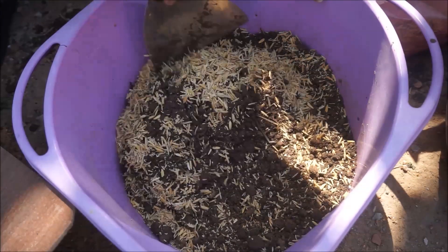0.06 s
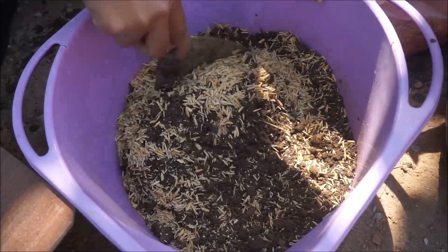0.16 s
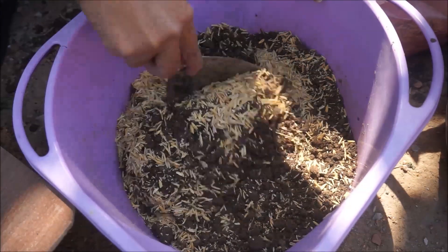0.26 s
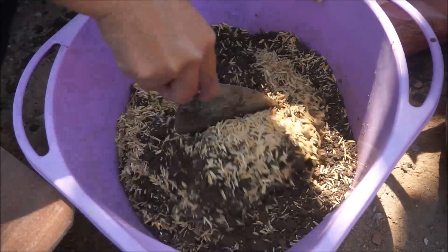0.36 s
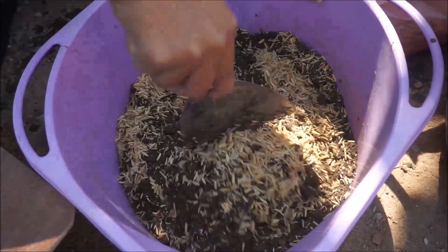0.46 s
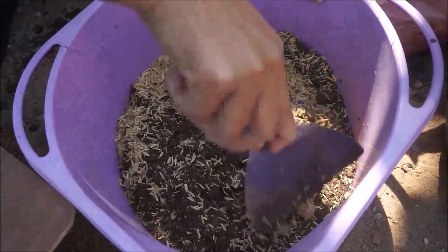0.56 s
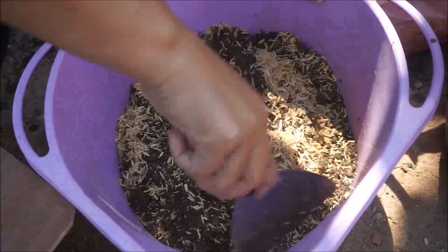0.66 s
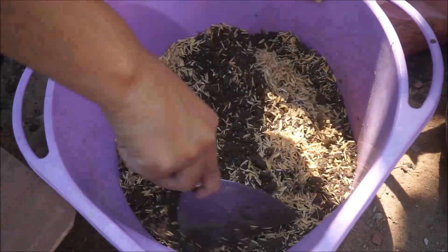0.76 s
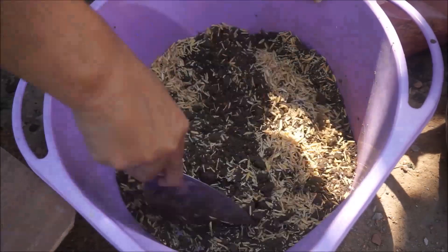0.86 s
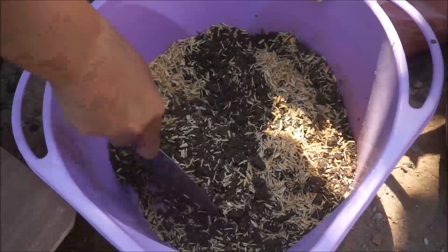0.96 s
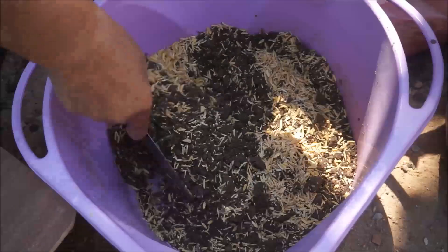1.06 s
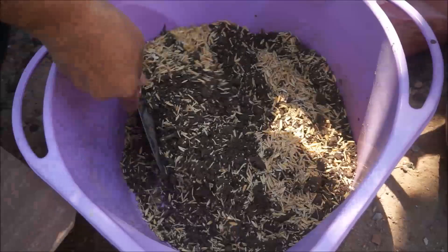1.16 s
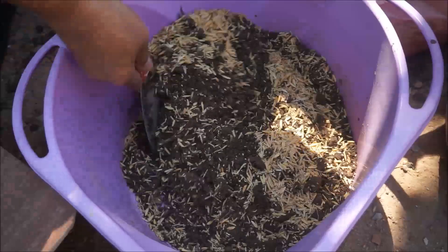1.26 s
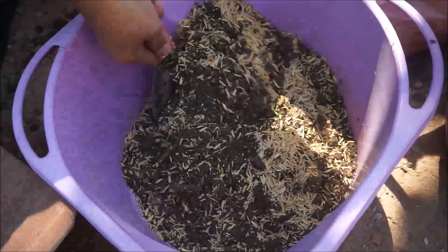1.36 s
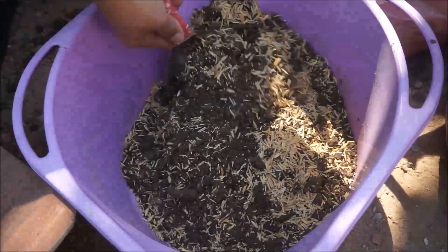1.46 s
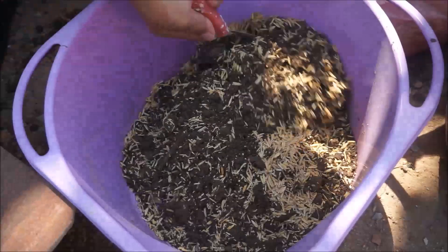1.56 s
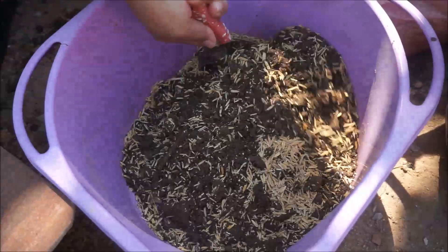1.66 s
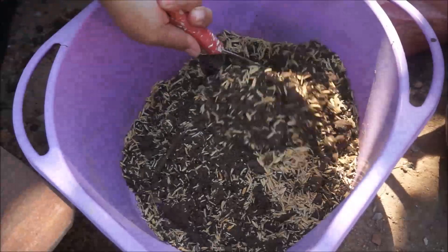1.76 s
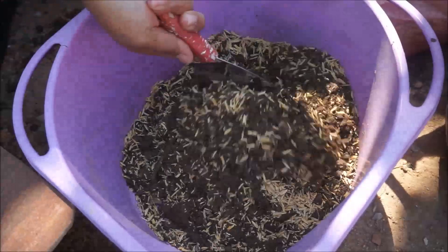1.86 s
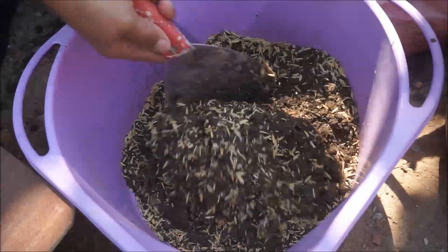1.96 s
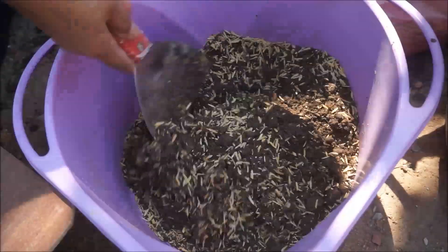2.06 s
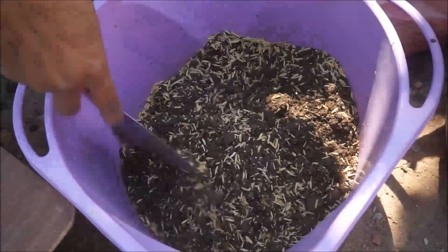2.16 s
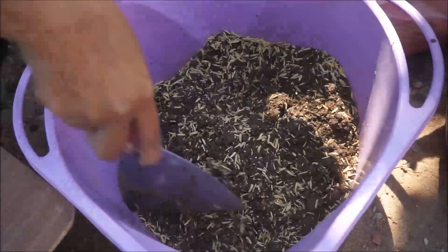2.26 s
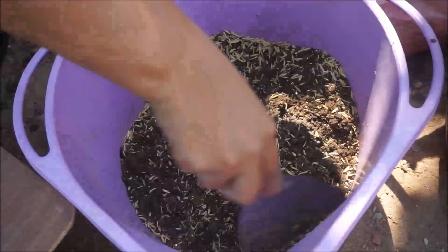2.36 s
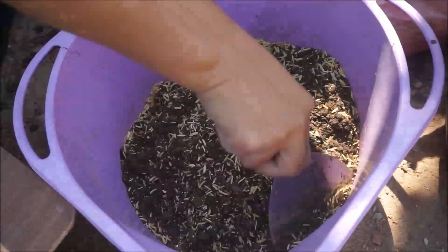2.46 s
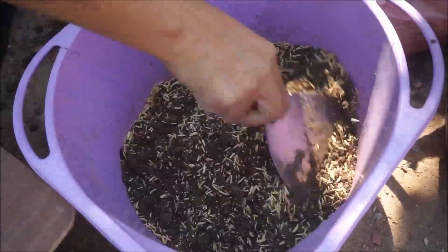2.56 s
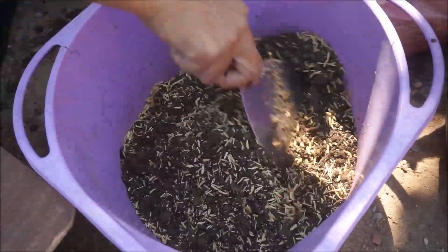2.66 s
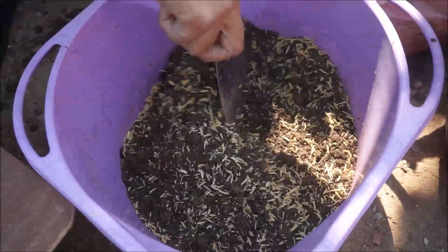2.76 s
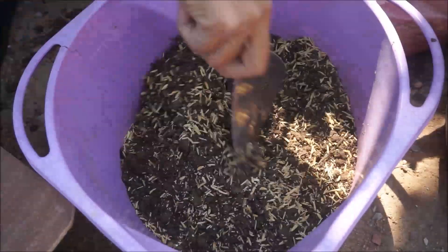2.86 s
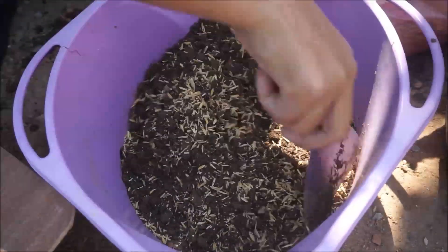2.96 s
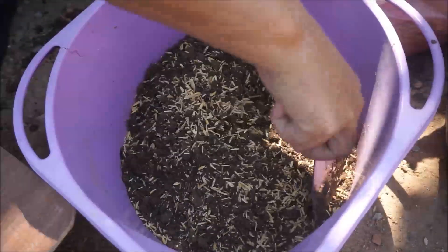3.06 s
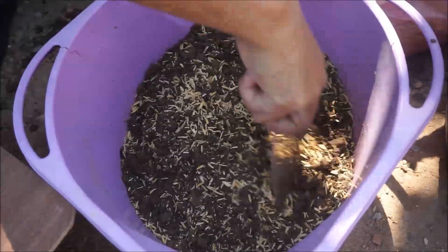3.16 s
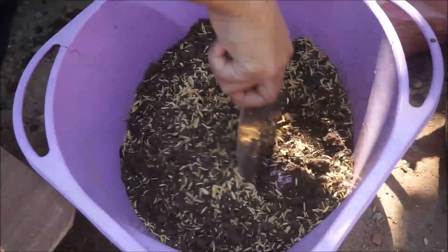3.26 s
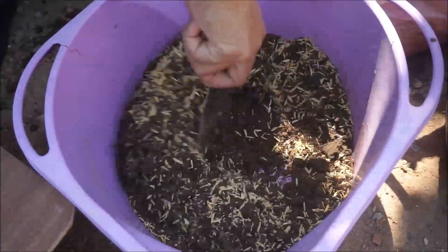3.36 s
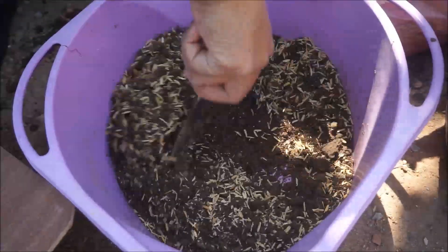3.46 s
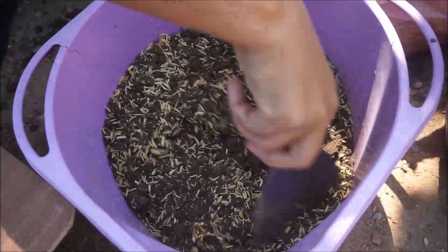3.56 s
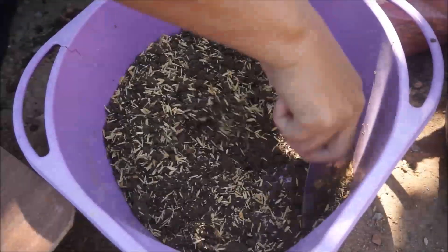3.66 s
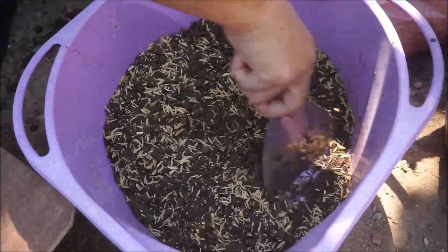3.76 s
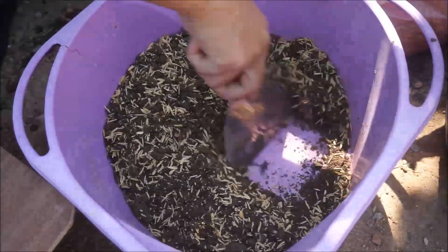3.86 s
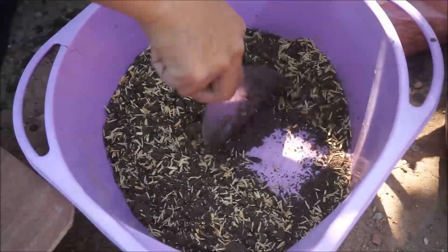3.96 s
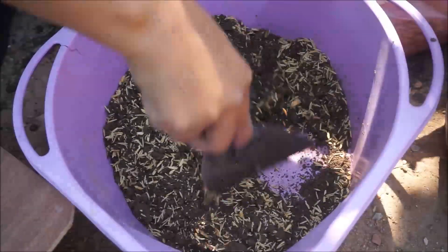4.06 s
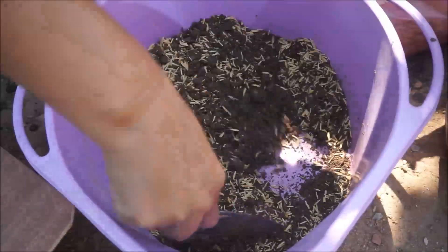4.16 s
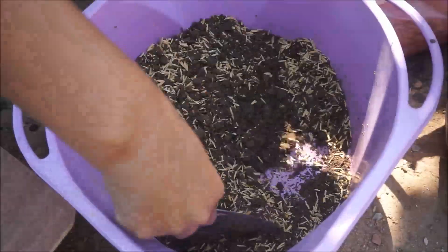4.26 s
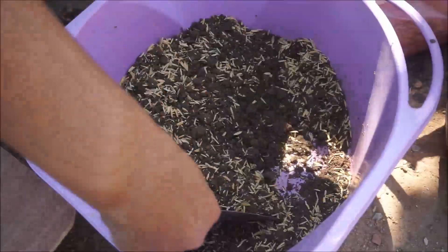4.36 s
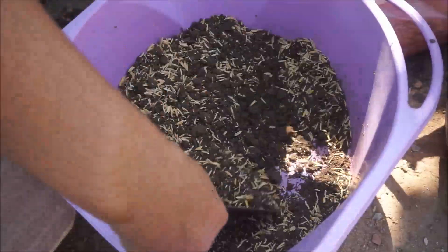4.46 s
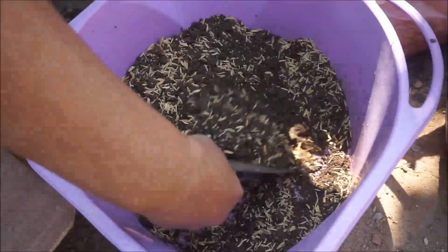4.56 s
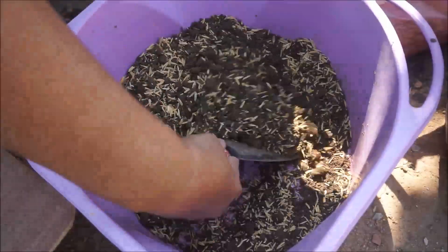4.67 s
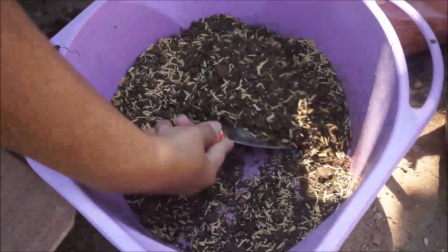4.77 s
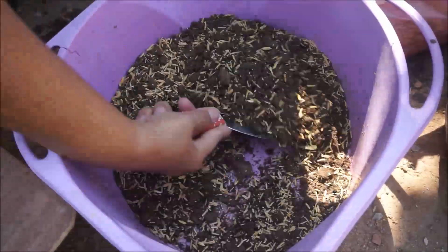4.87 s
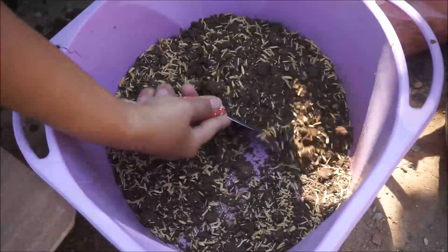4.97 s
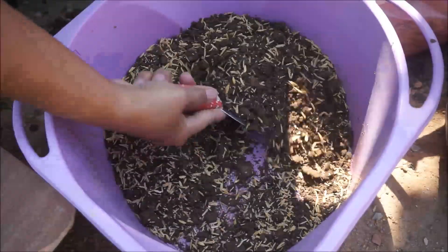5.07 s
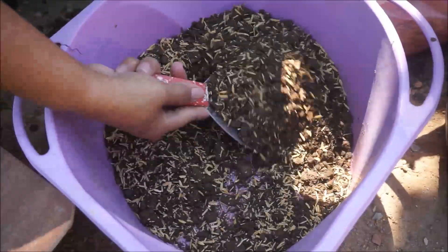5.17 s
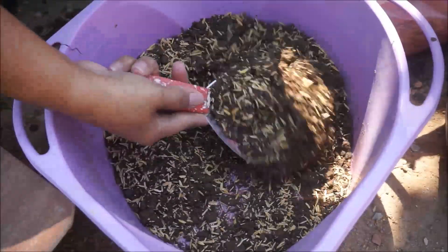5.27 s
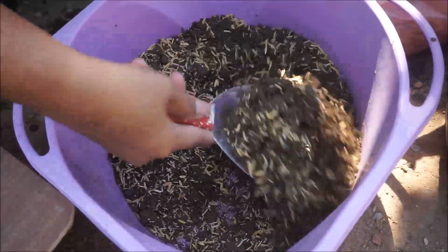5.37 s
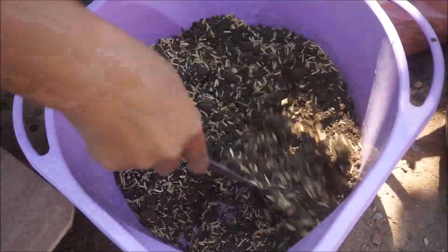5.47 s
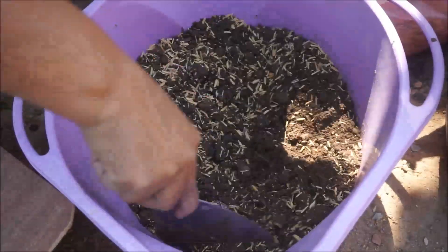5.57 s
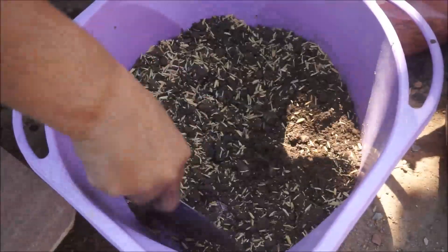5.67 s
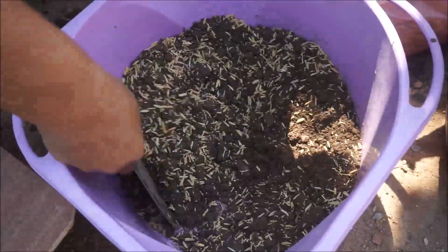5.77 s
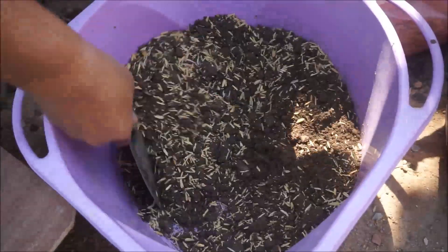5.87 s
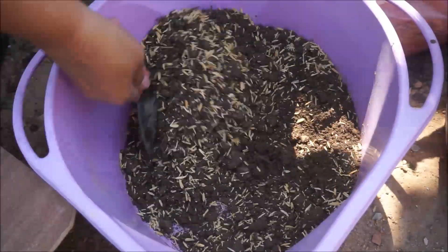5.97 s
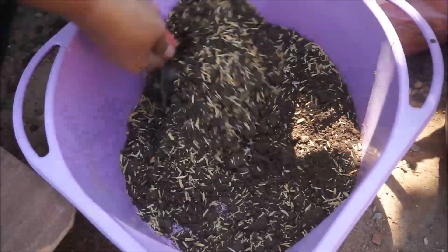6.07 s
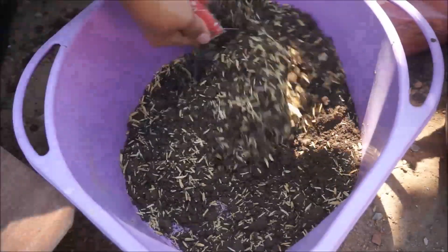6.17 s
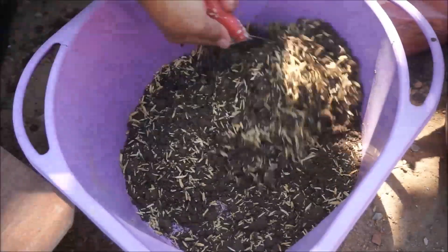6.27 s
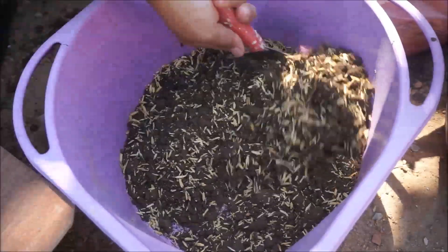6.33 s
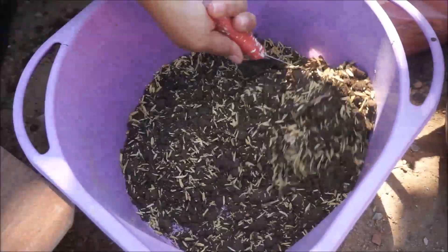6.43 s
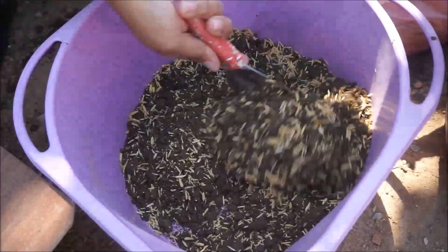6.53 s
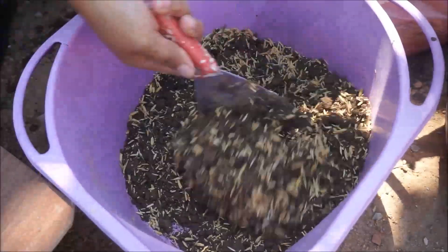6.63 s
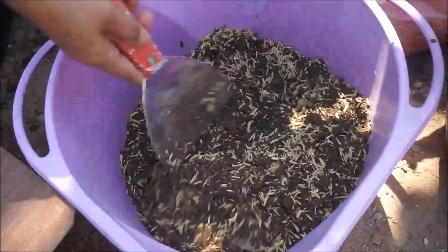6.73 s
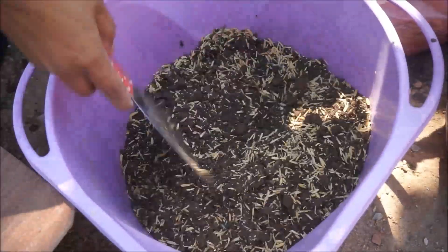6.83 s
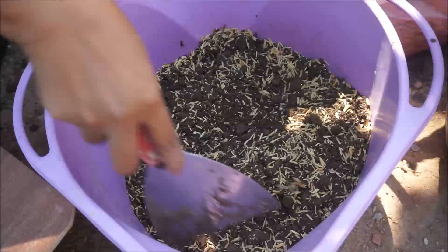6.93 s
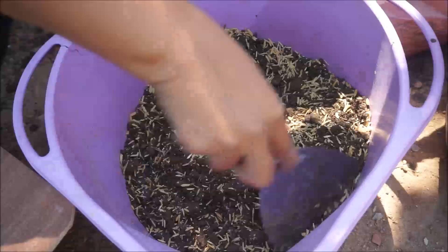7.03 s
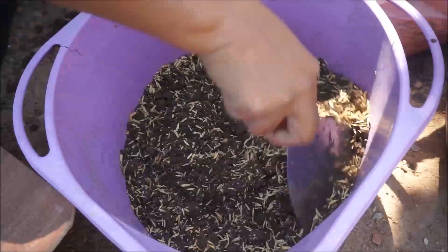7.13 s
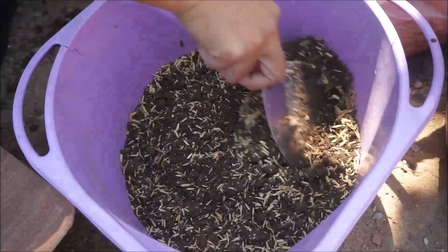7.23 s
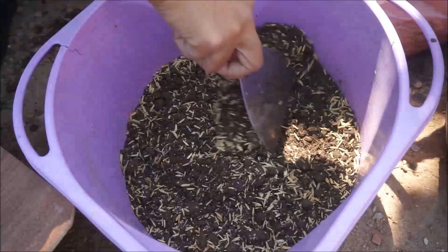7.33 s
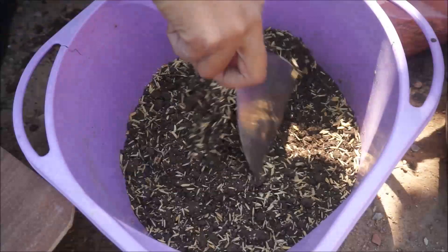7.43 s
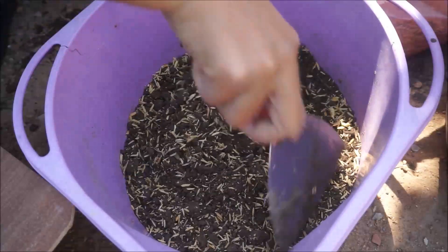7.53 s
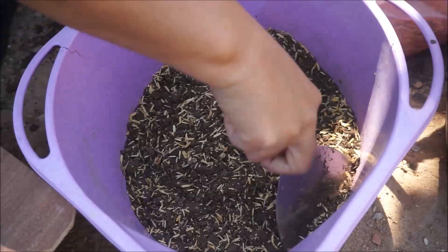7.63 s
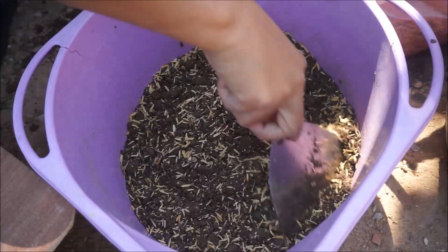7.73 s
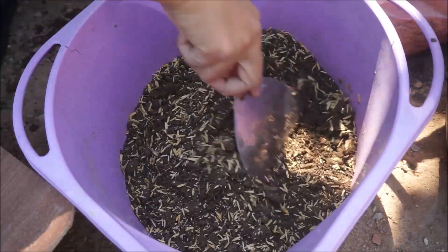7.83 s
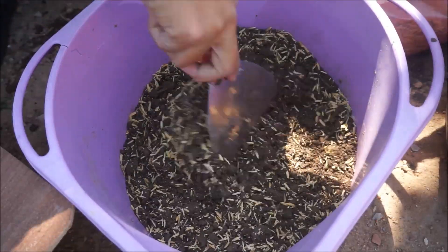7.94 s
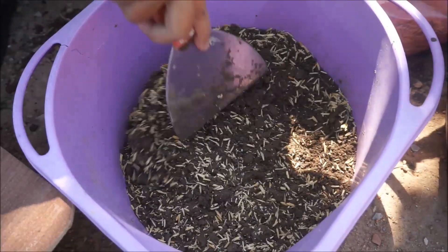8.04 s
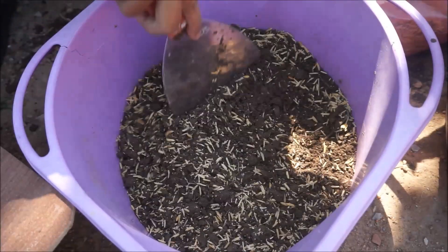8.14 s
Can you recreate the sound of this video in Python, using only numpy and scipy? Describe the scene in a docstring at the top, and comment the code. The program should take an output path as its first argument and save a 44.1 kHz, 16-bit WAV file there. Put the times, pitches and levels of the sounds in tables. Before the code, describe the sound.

Close outdoors, a steel trowel works dry soil and light husks in a plastic tub. Husks hiss off the blade at once, then a brief squeaky rub at 0.3 s leads to a crunchy push with knocks and a bright scrape around 0.7 s. Steady gritty strokes follow, with a swish of husks near 1.5 s. Hollow knocks land at 2.3-2.4 s, then a burst of rustling at 2.5 s and a hard clack at 3.0 s. Sharp clicks cluster at 3.6 s and 4.7-4.9 s amid longer, softer turning. At 5.6 s the blade jams with knocks and scrapes and the whole tub booms. A ringing click and rasp come near 6.1 s, then pouring husks and a quieter stretch. Dull knocks at 7.05 and 7.6 s precede light crunching to the end at about 8 s. A faint distant motor drone and wavering whine linger beneath.

```python
"""Trowel in a tub of dry soil

Outdoors, close to a phone's microphone, a steel hand trowel turns dry soil and husks in a plastic tub.
Damped modes of tub and blade give its knocks and ticks; filtered random clicks make soil crunch and husks hiss.
Gliding resonances make the edge scrape, and one hard shove flexes the whole tub.
Far away a motor drones as a stack of harmonics and a faint whine wavers as narrow noise."""
import sys
import numpy as np
from scipy import signal
from scipy.fft import rfft, irfft
from scipy.io import wavfile

SR = 44100
rng = np.random.default_rng(int(sys.argv[2]) if len(sys.argv) > 2 else 0)


def int16_out(signal):
    """Quantize to a 16-bit WAV file."""
    q = np.round(np.clip(np.atleast_2d(signal).T, -1, 1) * 32767)
    wavfile.write(sys.argv[1], SR, q.astype(np.int16))


N = 361616
TIME = np.arange(N) / SR


def undb(db):
    """Decibels to gain."""
    return 10 ** (np.asarray(db) / 20)


def unit(x):
    """Scale to rms 1."""
    return x / np.sqrt(np.mean(x ** 2) + 1e-20)


def curves(table):
    """Each column of a table, joined by straight lines in time."""
    s, *columns = np.transpose(table)
    return [np.interp(TIME, s, c) for c in columns]


def colour(x, points):
    """Filter by (Hz, dB) points with a causal response, so that clicks keep their front."""
    size = 2048
    hz, db = np.transpose(points)
    f = np.maximum(np.arange(size // 2 + 1) * SR / size, 1)
    log_gain = np.log(undb(np.interp(np.log(f), np.log(hz), db)))
    # folding the cepstrum onto positive time gives the minimum-phase response
    cepstrum = irfft(log_gain)
    cepstrum[1:size // 2] *= 2
    cepstrum[size // 2 + 1:] = 0
    response = irfft(np.exp(rfft(cepstrum)))
    return signal.fftconvolve(x, response[None], axes=1)[:, :x.shape[1]]


def band(x, hz, width_hz):
    """One fixed resonance."""
    b, a = signal.iirpeak(min(hz, SR / 3), hz / width_hz, fs=SR)
    return signal.lfilter(b, a, x)


def glide(x, hz, share):
    """A resonance that follows the curve hz; its width is a share of its mean pitch."""
    turn = np.exp(2j * np.pi * np.cumsum(hz) / SR)
    pole = np.exp(-np.pi * share * np.mean(hz) / SR)
    return (turn * signal.lfilter([1], [1, -pole], x / turn)).real


def walk(rate, count=N):
    """Smooth chance with spread near 1, changing rate times a second."""
    at = np.arange(count) * rate / SR
    knots = int(at[-1]) + 2
    return np.interp(at, np.arange(knots), rng.standard_normal(knots))


def clicks(rate, spread_db, count=N):
    """Random clicks of uneven size, rate a second, rows mid and side; each comes from its own place."""
    happens = rng.random(count) < rate / SR
    size = happens * undb(spread_db * np.minimum(rng.exponential(size=count), 5))
    place = np.array([rng.choice([-1., 1.], count), rng.standard_normal(count)])
    return unit(size * place)


def add(out, s, sound):
    """Mix a sound in at time s."""
    i = max(int(s * SR), 0)
    out[:, i:i + sound.shape[1]] += sound[:, :max(N - i, 0)]


def blow_level(x, db):
    """Give a blow the energy of 10 ms at this level."""
    energy = np.sum(x ** 2, axis=1, keepdims=True) + 1e-20
    return x * undb(db) * np.sqrt(SR / 100 / energy)


def ring(modes, t, detune, scatter_db):
    """Modes struck once; the place of the blow and the load of soil change their pitch and share."""
    hz, t60, db = np.transpose(modes)[:, :, None]
    chance = rng.standard_normal((2, len(modes), 1))
    waves = np.sin(2 * np.pi * hz * (1 + detune * chance[0]) * t) * np.exp(-np.log(1000) * t / t60)
    waves *= undb(db + scatter_db * chance[1])
    return rng.choice([-1., 1.], (2, len(modes))) @ waves


# Far motor, base rate before a small random waver: start_s, firing_rate_hz, level_db
MOTOR = [(0, 57.8, -87), (3.8, 55.3, -90), (4.1, 56.3, -67), (5.6, 51.46, -82.5), (8.2, 47.6, -71.5)]
# Strengths of multiples 2 to 5 of the firing rate: level_db
MOTOR_ORDERS_DB = [-4, 9, 5, 1]


def far_motor():
    """A distant motor drones on wavering harmonics of its firing rate; each comes and goes, and the pitch sinks."""
    hz, db = curves(MOTOR)
    phase = 2 * np.pi * np.cumsum(hz * (1 + .03 * walk(14))) / SR
    motor = np.zeros(N)
    for k, order_db in enumerate(MOTOR_ORDERS_DB, start=2):
        fade = undb(4 * walk(9))
        motor += undb(order_db) * fade * np.sin(k * phase)
    return unit(motor) * undb(db)


# Far whine, base pitch before a small random waver: start_s, pitch_hz, level_db
WHINE = [(0, 518, -69), (2.07, 525, -58.5), (2.7, 540, -57), (4.1, 533, -70), (6.5, 520, -64),
         (8.2, 525, -73)]


def far_whine():
    """Noise through two narrow resonances; the first wavers about the pitch that the second follows."""
    hz, db = curves(WHINE)
    wavering = glide(rng.standard_normal(N), hz * (1 + .03 * walk(7)), .1)
    return unit(glide(wavering, hz, .2)) * undb(db)


# Colour of the still air: frequency_hz, gain_db
AIR_COLOUR = [(25, -24), (70, -11), (110, -2), (180, 23.5), (500, 8), (1500, 4), (5000, -13), (11000, 12)]


def outdoors():
    """Still air as steady coloured noise all round, with the motor and the whine far off, near the centre."""
    air = unit(colour(rng.standard_normal((2, N)), AIR_COLOUR)) * undb(-66.5)
    return far_motor() + far_whine() + air


def scatter(x):
    """The ground and things nearby return a short, faint tail."""
    t = np.arange(SR // 4) / SR
    tail = rng.standard_normal((2, len(t))) * np.exp(-np.log(1000) * t / 0.21) * (t > .004)
    tail *= undb(-17) / np.sqrt(np.sum(tail ** 2) / 2)
    return x + signal.fftconvolve(x, tail, axes=1)[:, :N]


# Modes of the whole tub flexing: pitch_hz, t60_s, level_db (relative)
FLEX = [(96.6, 0.52, -31), (191, 0.16, -12.5), (266, 0.087, -3.5), (343, 0.045, 6), (527, 0.082, -4.5)]
SHOVE_S, SHOVE_DB = 5.642, -21.5  # start, and level as a blow


def shove():
    """The blade jams against the bottom and the whole tub booms; the open tub radiates no deep bass."""
    out, t = np.zeros((2, N)), np.arange(SR // 3) / SR
    boom = ring(FLEX, t, .01, 0.96) * (1 - np.exp(-(t / 0.0034) ** 2))
    boom = signal.sosfilt(signal.butter(2, 130, "high", fs=SR, output="sos"), boom)
    add(out, SHOVE_S, blow_level(boom, SHOVE_DB))
    return out


# The blade's edge rubbing on grit or plastic: start_s, length_s, first_hz, last_hz, level_db, squeak_over_rasp_db
# (a rasp below 2000 Hz is softer still)
SCRAPES = [(.275, 0.18, 750, 790, -42.5, 17), (0.251, .17, 1420, 1480, -43.5, 3),
           (0.277, .15, 2300, 2600, -45, -15), (0.729, 0.028, 1900, 2700, -34, -3),
           (0.732, 0.023, 3200, 5200, -30, 7), (1.108, 0.024, 6600, 7000, -32.5, -14),
           (1.169, 0.24, 2930, 3140, -41, -20), (2.548, .04, 7370, 7000, -37, -18),
           (2.724, 0.086, 2550, 2650, -45, 7), (3.044, 0.017, 8500, 9300, -35, -19),
           (3.199, 0.14, 814, 840, -45, 5), (3.716, 0.018, 6000, 4400, -34.5, -17),
           (3.761, .014, 5000, 3960, -40, -11), (4.21, 0.048, 885, 790, -48, 4),
           (4.462, 0.074, 845, 870, -47, 1), (5.345, 0.11, 1580, 1210, -36.5, 1),
           (5.58, 0.0054, 4470, 4200, -28, -15), (5.634, .013, 9550, 8300, -28, -12),
           (6.057, 0.052, 2860, 3150, -31, -10)]
SQUEAK_WAVER = .015  # share of its pitch
SQUEAK_LOCK = .5  # 0-1: how far the squeak's strength is evened out


def scrapes():
    """The edge sticks and slips: a narrow, wavering squeak and a broad rasp glide together."""
    out = np.zeros((2, N))
    for s, length, first_hz, last_hz, db, squeak_db in SCRAPES:
        count = int(max(length, .004) * SR)
        hz = min(np.sqrt(first_hz * last_hz), SR / 4)
        path = np.geomspace(first_hz, last_hz, count) * (1 + SQUEAK_WAVER * walk(62, count=count))
        slips = clicks(5000, 1.9, count=count) * undb(1.5 * walk(250, count=count))
        squeak = glide(glide(slips, path, .16), path, .16)
        envelope = np.abs(signal.hilbert(squeak)) + 1e-12
        squeak = squeak / envelope ** SQUEAK_LOCK
        rasp = band(glide(glide(slips, path, 1.0), path, 1.0), hz, hz)
        rub = undb(squeak_db) * unit(squeak) + min(hz / 2000, 1) * unit(rasp)
        add(out, s, unit(rub * signal.windows.tukey(count, .6)) * undb(db))
    return out


def grains(rate, spread_db, ring_db):
    """Tiny snaps: bare clicks, and others that ring for a few cycles at the pitch of their own husk or crumb."""
    pitches = np.geomspace(700, 11000, 12)
    rung = np.zeros((2, N))
    for hz in pitches:
        share = clicks(rate / len(pitches), spread_db)
        rung += unit(band(share, hz, hz / 4)) * np.sqrt(hz)
    return unit(clicks(rate, spread_db) + undb(ring_db) * unit(rung))


HOLLOW_DRIFT = 0.042  # spread of the wander, share of the pitch


def hollow(hz, share):
    """Grains rattle a resonance whose pitch drifts as the blade travels round the tub."""
    path = hz * (1 + HOLLOW_DRIFT * walk(5))
    return unit(glide(glide(clicks(900, 3), path, share), path, share))


# Pushes of the blade through the soil: start_s, rise_s, length_s (start to release),
# drag_db (on the tub), soil_db, husks_db
PUSHES = [(0.208, 0.13, 0.17, -47, -40.5, -46.5), (0.663, 0.083, 0.085, -45, -36, -33.5),
          (0.795, 0.028, 0.19, -44.5, -38, -40), (0.951, 0.15, 0.21, -42, -37, -39.5),
          (1.162, 0.033, 0.22, -44.5, -37.5, -38), (1.375, 0.073, 0.19, -47, -39, -41),
          (1.73, 0.063, 0.099, -58.5, -48, -49), (2.379, 0.046, .08, -46.5, -39.5, -37.5),
          (2.477, 0.024, 0.19, -54, -44.5, -41), (2.659, 0.24, 0.16, -38, -36.5, -61),
          (2.958, 0.036, 0.11, -45, -41, -43.5), (3.118, 0.052, 0.19, -50.5, -39.5, -41.5),
          (3.436, 0.033, 0.044, -44.5, -39.5, -56), (3.594, 0.16, 0.28, -47.5, -39.5, -44.5),
          (4.088, 0.14, 0.14, -47, -43, -44.5), (4.279, 0.056, 0.089, -54.5, -42, -47.5),
          (4.428, 0.17, 0.45, -47.5, -37, -42.5), (4.945, 0.15, 0.27, -56, -45, -52),
          (5.315, 0.16, 0.17, -44.5, -38.5, -50), (5.552, .02, 0.098, -43, -40, -44),
          (5.693, 0.011, 0.17, -45.5, -41, -42.5), (5.854, 0.05, 0.3, -46.5, -39, -41),
          (6.144, 0.047, 0.24, -53.5, -40.5, -46.5), (6.661, 0.077, 0.096, -50.5, -44.5, -44),
          (7.053, 0.026, 0.29, -50.5, -41.5, -44.5), (7.58, 0.066, 0.1, -46.5, -43, -43.5),
          (7.728, 0.063, 0.15, -51.5, -40.5, -50), (8.08, 0.063, 0.085, -52.5, -47, -47)]
RELEASE_S, TRICKLE_S = 0.046, 0.12  # decay times: soil stopping soon after the blade, and the trickle
# What runs on after a push, relative to it, in the order drag, soil, husks: level_db
TRICKLE_DB = [-8, -8, -5]
# The heap never lies quite still, in the order drag, soil, husks: level_db
REST_DB = [-74, -85, -61]
# Husks sliding off the lifted blade: start_s, length_s (sets the pace; the end thins out), level_db
POURS = [(-.1, 0.37, -44), (0.036, 0.2, -34), (0.352, 0.35, -47), (1.398, 0.35, -36.5), (1.7, 0.88, -47.5),
         (2.502, 0.11, -31.5), (2.597, 0.31, -40), (3.304, 0.3, -46), (5.102, 0.58, -46.5),
         (6.114, 0.26, -39.5), (6.4, 0.32, -47), (7.172, 0.15, -40.5), (8.14, 0.17, -40)]
POUR_PEAK = 0.45  # share of a pour at which it is thickest
# Patter on the tub, soil and husks, relative to the pour: level_db
POUR_DB = [-21, -10, -2]
# Drag, soil and husks stirred up by a knock, relative to its blade level: level_db
SPRAY_DB = [-42, -17, -40]
SPRAY_LEAD_S, SPRAY_S = .003, 0.035  # short rise of the spray before a knock, and its decay as crumbs settle


def flow():
    """Drag, soil and husk levels in dB: pushes rise, hold, stop and trickle; pours swell and thin out; knocks spray."""
    t = np.arange(0, N / SR, .001)
    moves = [undb(REST_DB)[:, None] * np.ones(len(t))]
    for s, rise, length, drag_db, soil_db, husk_db in PUSHES:
        after = np.maximum(t - s - length, 0)
        trickle = undb(TRICKLE_DB)[:, None] * np.exp(-after / TRICKLE_S)
        fall = np.maximum(np.exp(-after / RELEASE_S), trickle)
        moves.append(undb([drag_db, soil_db, husk_db])[:, None] * np.clip((t - s) / rise, 0, 1) * fall)
    for s, length, db in POURS:
        age = np.maximum(t - s, 0) / (POUR_PEAK * length)
        moves.append(undb(db) * undb(POUR_DB)[:, None] * (age * np.exp(1 - age)) ** 2)
    for s, _, _, blade_db, _, _ in KNOCKS:
        spray = np.exp(-np.maximum((s - t) / SPRAY_LEAD_S, (t - s) / SPRAY_S))
        moves.append(undb(blade_db) * undb(SPRAY_DB)[:, None] * spray)
    power = sum(move ** 2 for move in moves)
    return [np.interp(TIME, t, db) for db in 10 * np.log10(power)]


# Colours of the tub's murmur, the soil and the husks: frequency_hz, gain_db
DRAG_COLOUR = [(40, -46), (130, -25), (200, -15.5), (270, -3), (355, 3.5), (440, 0), (600, -5), (850, -0.5),
               (1500, -41.5)]
CRUNCH_COLOUR = [(300, -39), (620, -8), (800, -2), (1080, -3), (1520, -2.5), (1900, -6), (2600, -5.5),
                 (3600, -12.5), (5500, -17), (11000, -29.5)]
HUSK_COLOUR = [(1200, -24), (2800, -4), (4200, -3), (6000, -2), (8500, 0), (11000, 1)]
SLIP_DB, JUDDER_DB = 1.3, 1.0  # unevenness of the soil's slow slips and fast judder
TUMBLE_DB = 1.3  # husks tumble in small clumps of their own
WALL_RING_DB, BLADE_RING_DB = -6.5, -9  # hollow rings: wall relative to the drag, blade relative to the soil
FIRM_DB = -40  # soil level of an ordinary push


def stirring():
    """Soil gives way in little slips, which shake the tub, the crumbs and the husks together; single clods crack."""
    drag_db, crunch_db, husk_db = flow()
    slips = SLIP_DB * walk(45) + JUDDER_DB * walk(220)
    drag = unit(colour(clicks(1500, 2.6), DRAG_COLOUR)) * undb(drag_db + slips)
    crumbs, chaff = grains(3500, 3, 1.4), grains(7000, 2.9, .6)
    clods, husk_snaps = grains(60, 0.93, 0.83), grains(98, 1.5, 1.8)
    crunch = unit(colour(crumbs + undb(-12.0) * clods, CRUNCH_COLOUR)) * undb(crunch_db + slips)
    husks = unit(colour(chaff + undb(-19) * husk_snaps, HUSK_COLOUR))
    husks = husks * undb(husk_db + 0.58 * slips + TUMBLE_DB * walk(110))
    # husks grind against the steel only when they slide and the blade also presses into the soil
    press_db = np.minimum(crunch_db, husk_db)
    grind_db = press_db + 0.76 * (press_db - FIRM_DB) + 0.5
    grind = unit(band(band(grains(2500, 0.27, 0.82), 2480, 3600), 2480, 3600))
    grind = grind * undb(grind_db + slips + TUMBLE_DB * walk(160))
    wall = hollow(803, 0.16) * undb(drag_db + WALL_RING_DB + slips)
    blade = hollow(1493, .14) * undb(crunch_db + BLADE_RING_DB + slips)
    return drag + wall + blade + crunch + husks + grind


def crush(count):
    """Grit or husk breaking: a few ms of dense clicks, then a few more as it settles."""
    t = np.arange(count) / SR
    contact = (1 - np.exp(-t / 0.000068)) * np.exp(-(t / 0.0048) ** 2)
    settling = undb(-17) * np.exp(-t / .007)
    return clicks(20000, 0.97, count=count) * (contact + settling)


# Single dry husks snapping: start_s, level_db
SNAPS = [(.019, -41), (1.175, -43), (5.825, -50), (7.717, -42.5)]


def snaps():
    """A husk snaps with a bare crack: one short crush in the husks' colour."""
    out = np.zeros((2, N))
    for s, db in SNAPS:
        add(out, s, blow_level(colour(crush(SR // 10), HUSK_COLOUR), db))
    return out


# Modes damped by the soil, of the bottom (at BOTTOM_HZ), the wall and the blade: pitch_hz, t60_s, level_db (relative)
BOTTOM = [(259, 0.13, -24.5), (336.5, 0.16, -15), (375, 0.054, 2.5), (393.6, 0.033, 3.5), (547, 0.036, -8)]
WALL = [(709, 0.044, -5.5), (730, 0.015, -8), (821, 0.043, 2), (941, 0.027, -1)]
BLADE = [(1140, 0.043, -6), (1466, 0.011, 7.5), (1593, 0.017, 5), (1880, 0.0095, -4.5), (2380, 0.018, 0),
         (2700, 0.006, -8), (3240, 0.013, -13), (3870, 0.012, -15.5)]
# Colours of the crushed grit and of the crumbs cracking under the steel: frequency_hz, gain_db
GRIT_COLOUR = [(500, -30), (1500, 2.5), (3000, 4.5), (4300, 4), (6000, -3.5), (8500, -4), (11000, -7)]
CRACK_COLOUR = [(500, -28), (1200, 1), (2300, -1.5), (3500, -6.5), (6000, -20)]
BOTTOM_HZ = 377  # pitch of the bottom under an average load of soil
CUT_S = .001  # time the blade takes to cut through the last grit
CLACK_DB, CRACK_DB = -1, -4.5  # steel landing and crumbs cracking, relative to the blade's chatter
CRUSH_DB = 3  # added to the grit level of every blow


def strike(bottom_db, wall_db, blade_db, grit_db, bottom_hz):
    """The blade crushes grit, clacks, and pushes the tub, whose bottom swings a little later."""
    t = np.arange(SR // 10) / SR
    grit = crush(len(t))
    loaded = [(hz * bottom_hz / BOTTOM_HZ, t60, db) for hz, t60, db in BOTTOM]
    bottom = ring(loaded, t, 0.022, 3.7) * (1 - np.exp(-(t / 0.0036) ** 2))
    wall = ring(WALL, t, 0.029, 4.4) * (1 - np.exp(-t / 0.00094))
    clack = ring(BLADE, t, 0.051, 1.0)
    clack = np.pad(clack, ((0, 0), (int(CUT_S * SR), 0)))[:, :len(t)]
    # every breaking grain rings the blade
    chatter = signal.fftconvolve(ring(BLADE, t, 0.1, 1.0), grit[:1], axes=1)[:, :len(t)]
    crack = colour(crush(len(t)), CRACK_COLOUR)
    blade = unit(chatter) + undb(CLACK_DB) * unit(clack) + undb(CRACK_DB) * unit(crack)
    body = blow_level(bottom, bottom_db) + blow_level(wall, wall_db) + blow_level(blade, blade_db)
    return body + blow_level(colour(grit, GRIT_COLOUR), grit_db + CRUSH_DB)


# Colour of a tick's crack, nearly even: frequency_hz, gain_db
TICK_COLOUR = [(300, -3.5), (1400, -2.5), (2600, -2.5), (6000, -3.5)]
# The half-buried blade ringing in a tick: multiple_of_pitch, t60_s, level_db (relative)
TICK_MODES = [(.68, 0.014, -7.5), (1, 0.016, -2)]
TICK_BOTTOM_DB, TICK_WALL_DB = -16.5, -11  # relative to the blade
TICK_GRIT_DB = -21  # relative to the blade, before CRUSH_DB
TICK_RING_DB = -2  # level of the ring as a blow; the crack's blade has 0 before TICK_COLOUR


def tick(hz):
    """A crumb cracks under the blade, which rings for a few cycles at a pitch set by how deep it is buried."""
    t = np.arange(SR // 10) / SR
    crack = colour(strike(TICK_BOTTOM_DB, TICK_WALL_DB, 0, TICK_GRIT_DB, BOTTOM_HZ), TICK_COLOUR)
    modes = [(hz * ratio, t60, db) for ratio, t60, db in TICK_MODES]
    blade = ring(modes, np.maximum(t - CUT_S, 0), 0.024, 1)
    return crack + blow_level(blade, TICK_RING_DB)


# The blade clicking on a hard crumb or clod, with a little of the tub's knock: start_s, level_db, pitch_hz
TICKS = [(.223, -40.5, 3700), (.446, -38.5, 2000), (0.508, -40.5, 1560), (.516, -39, 1630),
         (0.6285, -36.5, 1660), (.642, -34.5, 1860), (1.521, -34.5, 1900), (1.653, -36.5, 940),
         (1.673, -36, 2500), (2.1294, -37.5, 1680), (2.2063, -39.5, 990), (2.223, -38.5, 1420),
         (2.4363, -36, 1610), (2.9156, -39, 1990), (3.031, -31, 1540), (3.6458, -21, 1520),
         (3.805, -37, 2090), (4.206, -38, 1050), (4.514, -39, 940), (4.669, -33.5, 1300),
         (4.686, -27.5, 1480), (4.7798, -30, 1400), (4.819, -29, 1040), (4.877, -35.5, 1510),
         (4.983, -36.5, 1400), (5.3537, -35, 1400), (5.953, -34.5, 1550), (6.078, -24, 2270),
         (6.7379, -38, 1870), (6.8321, -32, 2430), (7.091, -33, 1510), (8.1315, -32, 1180)]


def ticks():
    """Each tick rings at the pitch of its own contact."""
    out = np.zeros((2, N))
    for s, db, hz in TICKS:
        add(out, s, blow_level(tick(hz), db))
    return out


# The blade striking the tub through the soil: start_s, bottom_db, wall_db, blade_db,
# grit_db (crushed grit, before CRUSH_DB), bottom_hz (pitch of the bottom under its load)
KNOCKS = [(.6623, -28.5, -25, -30, -32.5, 373), (0.6658, -32.5, -27, -33, -25, 361),
          (0.7098, -38, -30.5, -31, -35, 372), (.8617, -41, -38, -34, -37, 365),
          (2.163, -38.5, -43, -40, -48.5, 385), (2.323, -30, -35, -32, -39.5, 384),
          (2.376, -21.5, -21, -24.5, -38, 397), (2.395, -41, -45, -30, -43, 398),
          (2.4099, -39, -41, -30, -48, 385), (2.7996, -35.5, -38, -40, -59, 358),
          (2.99, -42.5, -32, -30.5, -52, 390), (2.9964, -19.5, -24, -22.5, -40.5, 402),
          (3.0146, -30, -30.5, -21.5, -30.5, 366), (3.4435, -31.5, -30.5, -41, -70, 388),
          (3.4568, -36, -35, -33.5, -66, 383), (3.6152, -35, -36, -30, -58, 368),
          (3.638, -33, -37, -21, -35.5, 368), (3.6446, -30, -25, -25, -33.5, 369),
          (3.844, -37, -33.5, -32.5, -40, 418), (4.048, -48, -49, -58, -58, 372),
          (4.1705, -52, -46, -26, -31.5, 420), (4.1777, -36.5, -36, -28, -35, 428),
          (4.575, -37.5, -37, -35, -42, 351), (5.502, -36.5, -42.5, -41, -43, 394),
          (5.5678, -21, -23, -21.5, -29.5, 350), (5.603, -34, -28, -36, -36, 355),
          (5.6133, -41, -34, -29, -31.5, 355), (5.6371, -27, -36, -32.5, -31.5, 360),
          (6.758, -44, -47, -39, -57, 305), (6.997, -36.5, -38.5, -40.5, -55, 407),
          (7.0455, -24.5, -24, -28.5, -49, 374), (7.0665, -29, -28, -27.5, -36, 370),
          (7.575, -26.5, -25, -21.5, -33.5, 410), (7.5894, -36, -35, -41, -43, 413),
          (7.6386, -46, -36, -30, -38, 386), (8.1315, -45, -37.5, -36, -61, 358)]
REBOUND_S, REBOUND_DB = 0.015, -18  # the blade lands a second time, about this much later and softer


def knocks():
    """Each knock shakes the tub and rebounds once."""
    out = np.zeros((2, N))
    for s, bottom_db, wall_db, blade_db, grit_db, bottom_hz in KNOCKS:
        levels = np.array([bottom_db, wall_db, blade_db, grit_db])
        add(out, s, strike(*levels, bottom_hz))
        again_s = s + REBOUND_S * rng.uniform(.85, 1.2)
        add(out, again_s, strike(*(levels + REBOUND_DB), bottom_hz))
    return out


def blows():
    """Knocks, ticks and snaps without their lows: a patch of wall radiates little bass."""
    highpass = signal.butter(3, 230, "high", fs=SR, output="sos")
    return signal.sosfilt(highpass, knocks() + ticks() + snaps())


# Width of the picture, applied to the side signal: frequency_hz, gain_db
WIDTH = [(150, -15.5), (350, -19), (600, -13), (1000, -13), (2000, -9), (4000, -5), (8000, -4), (11000, -3)]
# Lean of the picture, mostly to the right, the nearer ear: frequency_hz, left_minus_right_db
LEAN = [(400, 0), (1000, 0.5), (2000, -1.4), (4000, -2.5), (8000, -0.4)]


def scene():
    """All sources as mid and side, then left and right; highs spread wide while lows stay near the centre."""
    mid, side = stirring() + scrapes() + scatter(blows() + shove()) + outdoors()
    side = colour(side[None], WIDTH)
    left = colour(mid + side, [(hz, db / 2) for hz, db in LEAN])
    right = colour(mid - side, [(hz, -db / 2) for hz, db in LEAN])
    return np.vstack([left, right])


TOP_HZ = 11050  # upper edge of the phone's band


def record(dry):
    """The phone rounds the loudest peaks and cuts the top steeply."""
    ceiling = 0.8
    rounded = ceiling * np.tanh(dry / ceiling)
    return signal.sosfilt(signal.ellip(10, .2, 75, TOP_HZ, fs=SR, output="sos"), rounded)


dry = scene()
out = record(dry)
int16_out(out)
```